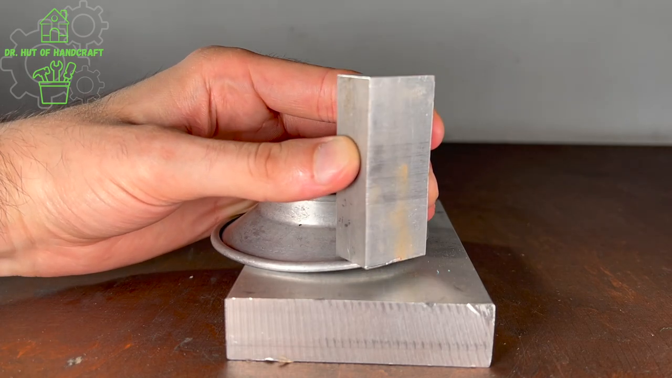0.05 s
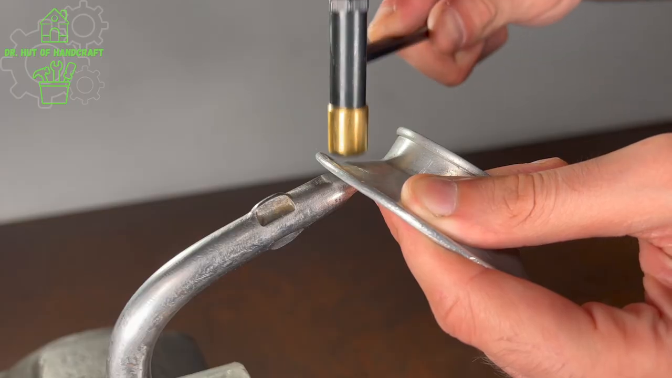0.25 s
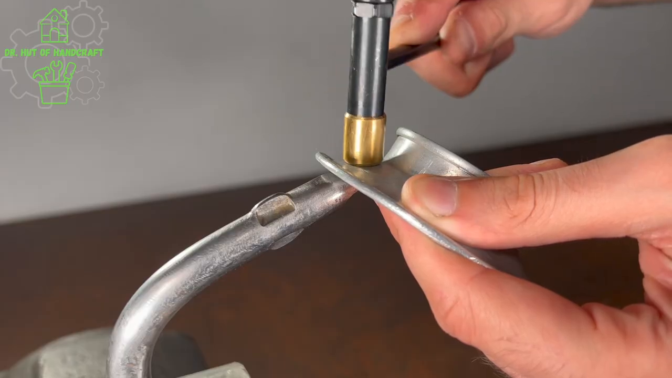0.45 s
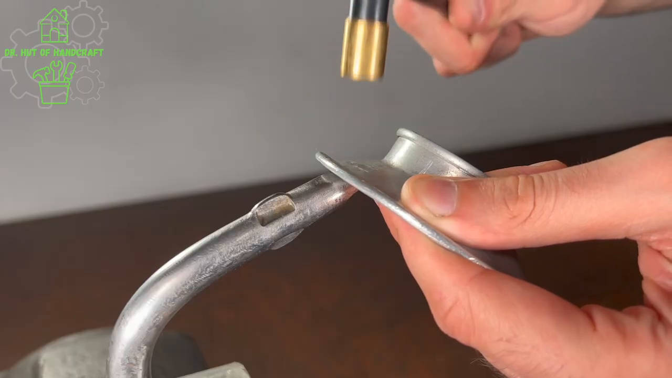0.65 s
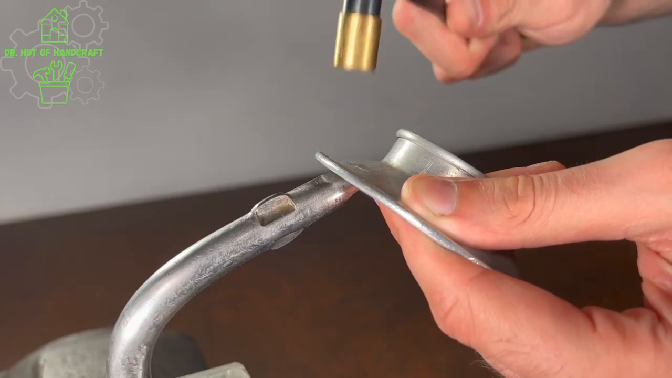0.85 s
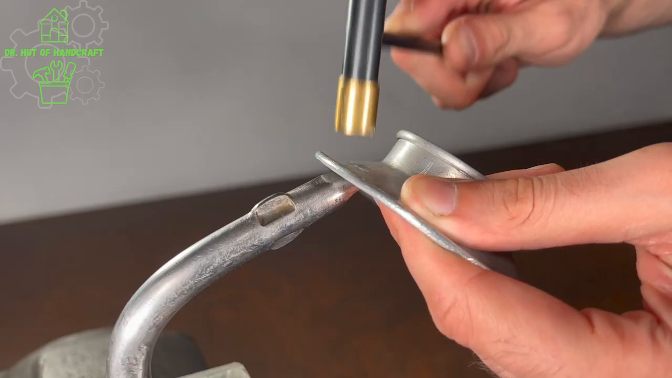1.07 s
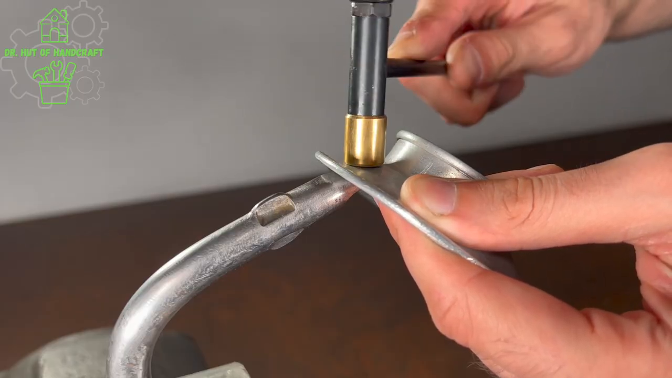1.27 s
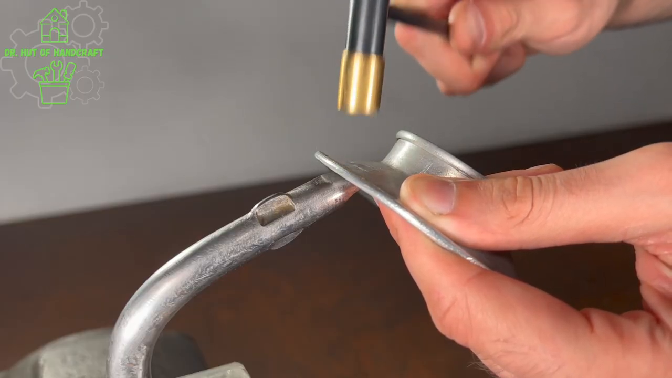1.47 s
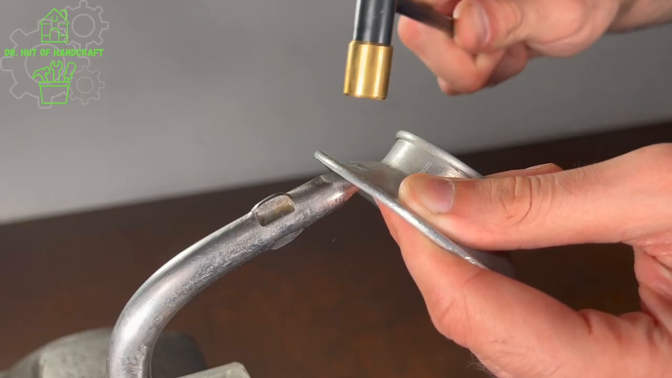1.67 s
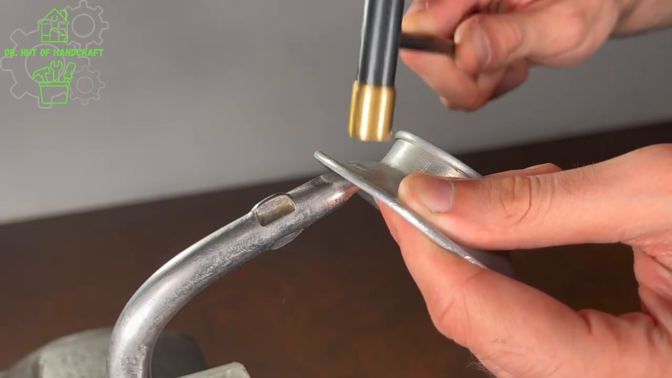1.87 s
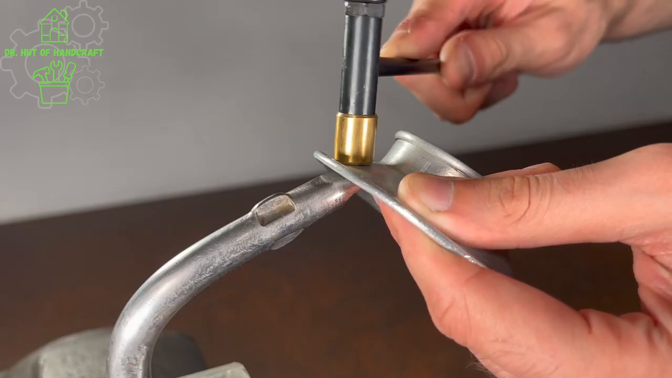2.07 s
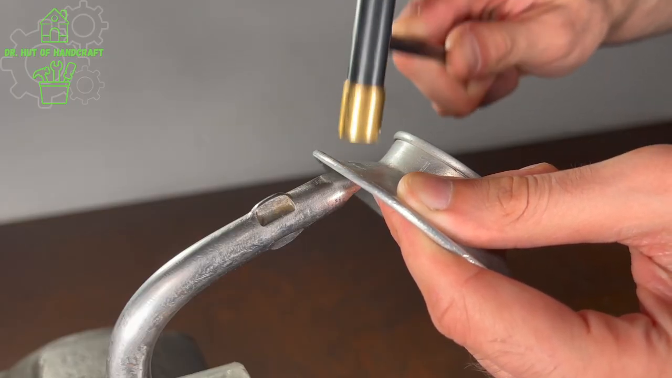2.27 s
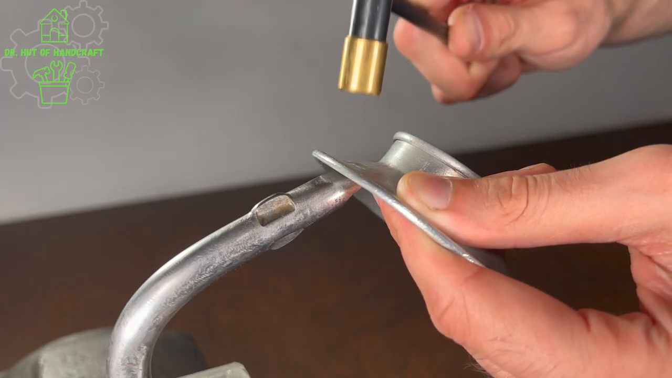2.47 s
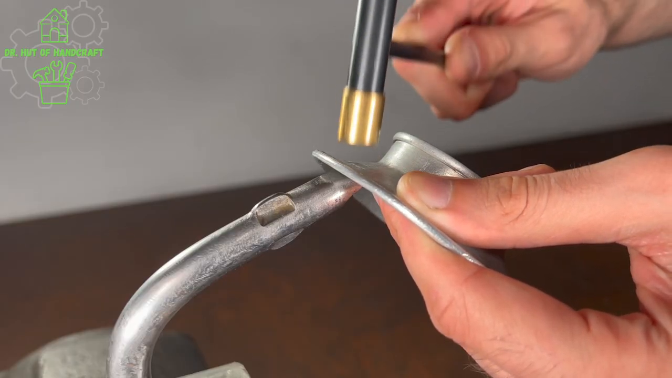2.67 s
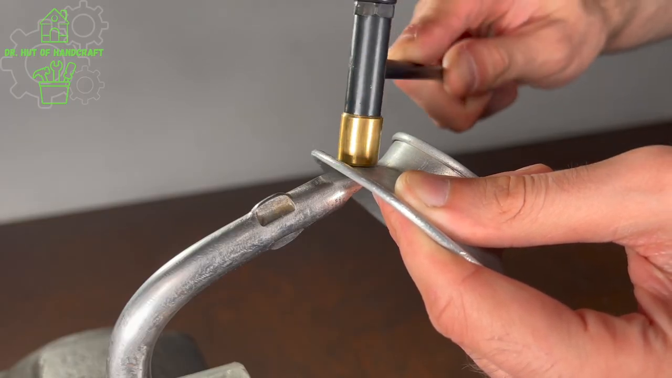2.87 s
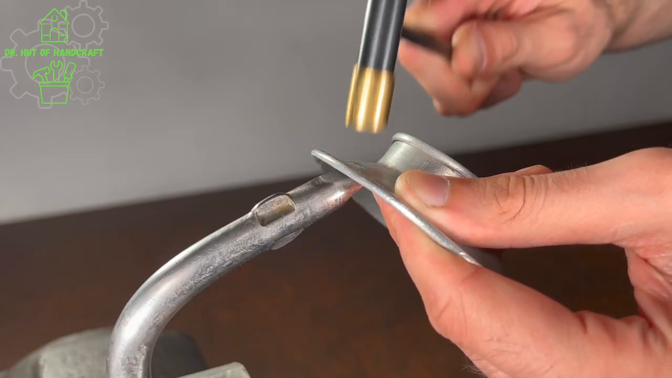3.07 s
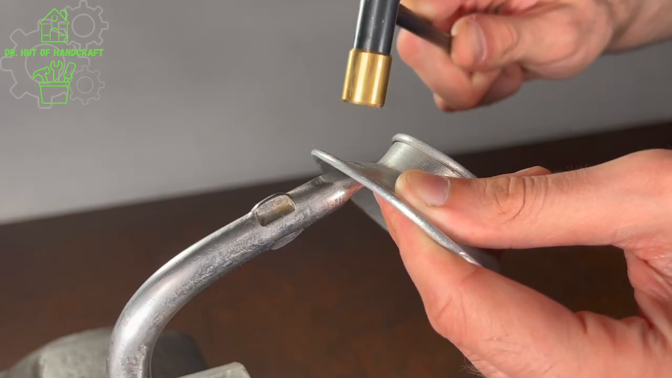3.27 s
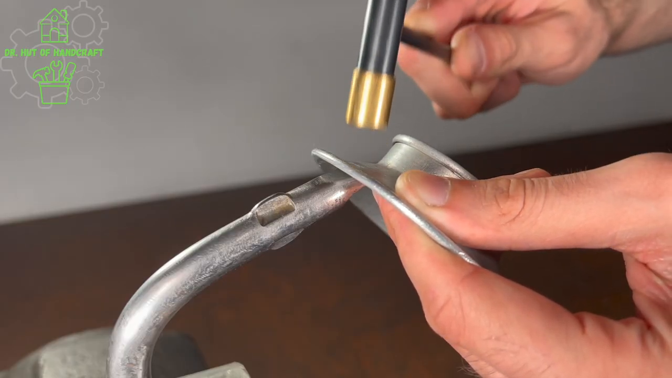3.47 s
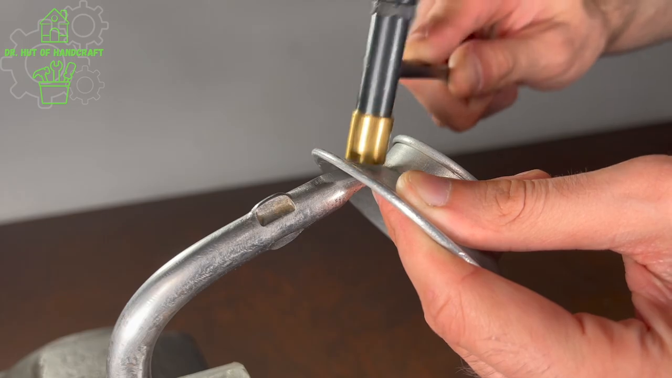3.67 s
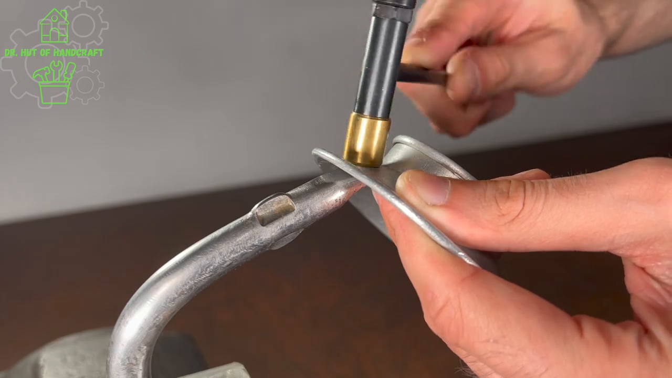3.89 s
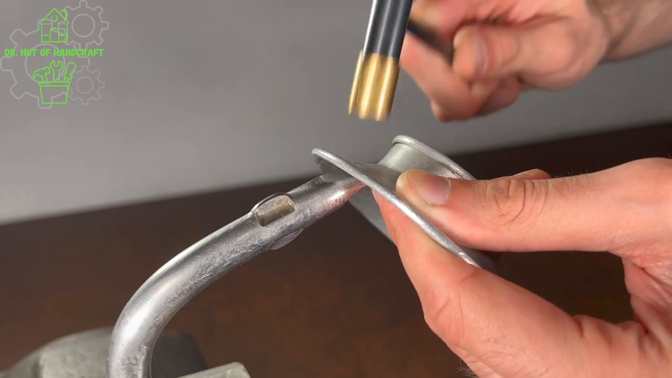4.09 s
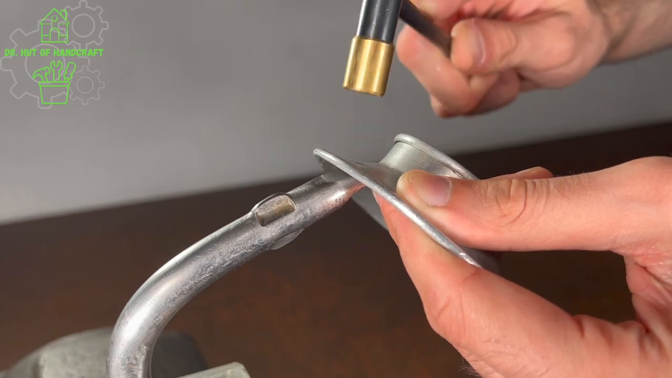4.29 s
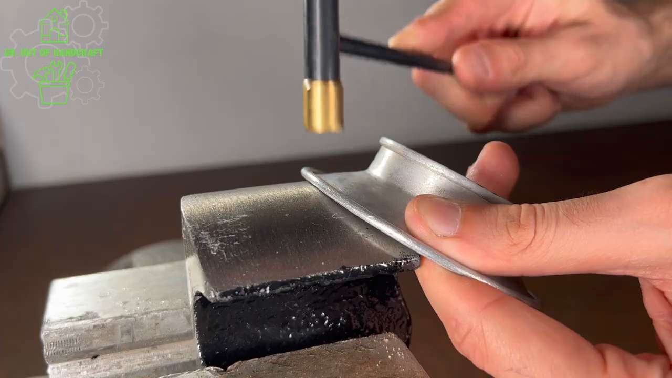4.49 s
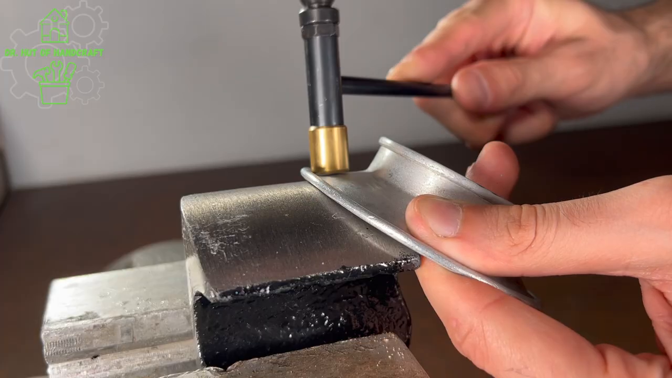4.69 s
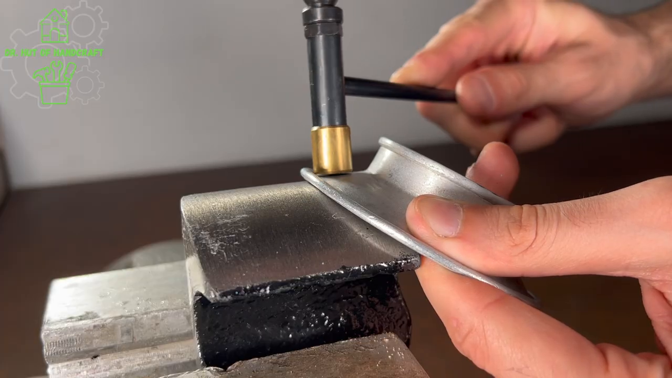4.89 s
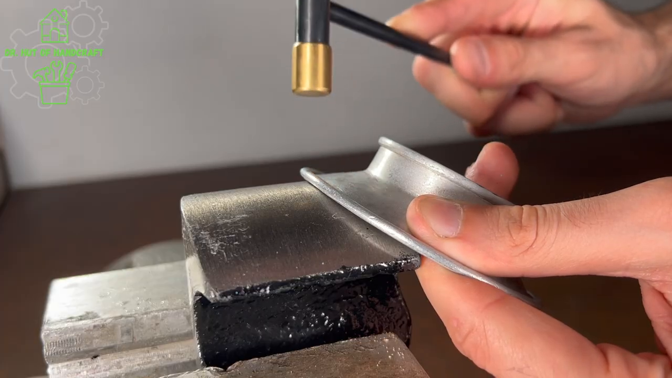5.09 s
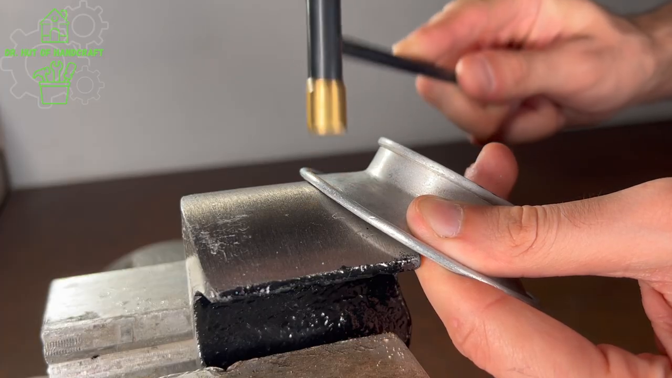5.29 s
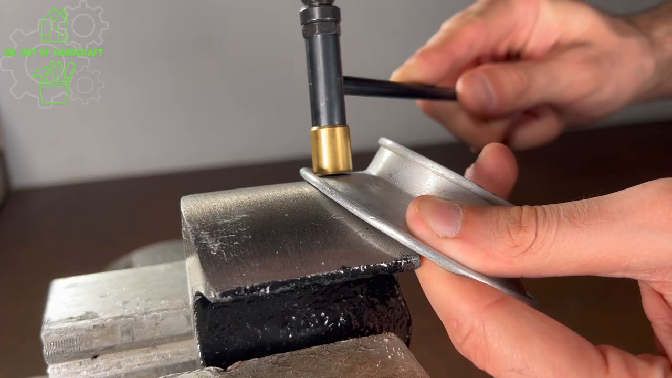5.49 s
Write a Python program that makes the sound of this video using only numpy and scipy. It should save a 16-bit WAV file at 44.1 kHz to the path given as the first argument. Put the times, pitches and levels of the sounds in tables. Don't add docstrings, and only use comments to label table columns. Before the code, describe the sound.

A small brass hammer taps a sheet-metal part about four times a second, sharp ticks with a faint steel ring, then duller over a block.

```python
import sys
import numpy as np
from scipy import signal
from scipy.fft import rfft, irfft, next_fast_len
from scipy.io import wavfile

SR = 44100
rng = np.random.default_rng(int(sys.argv[2]) if len(sys.argv) > 2 else 0)


def generate_wav(sig):
    pcm = np.round(np.clip(np.atleast_2d(sig).T, -1, 1) * 32767).astype(np.int16)
    wavfile.write(sys.argv[1], SR, pcm)


def to_linear_factor(level_db):
    exponent = np.asarray(level_db, float) / 20
    return 10 ** exponent


N = 244314
LEAD = round(0.3 * SR)
SIZE = next_fast_len(N + LEAD + SR)


def rms_one(x):
    return x / np.sqrt(np.mean(x ** 2) + 1e-20)


def at_hz(points, hz, column=1):
    points = np.array(points)
    return np.interp(np.log(hz), np.log(points[:, 0]), points[:, column])


def pitches(length):
    return np.maximum(np.arange(length // 2 + 1) * SR / length, 1)


def lay(times, sounds):
    out = np.zeros(SIZE)
    for start_s, sound in zip(times, sounds):
        at = LEAD + round(start_s * SR)
        out[at:at + len(sound)] += sound
    return out


def strike(times, level_db, modes, offset_db, swell_s, delay_s, scatter_db, rattle_db, rattle_t60_s):
    hz, mode_db, t60 = np.transpose(modes)[:, :, None]
    length_s = min(1.2 * max(t60.max(), rattle_t60_s), 0.5)
    t = np.arange(round(length_s * SR)) / SR
    shape = to_linear_factor(mode_db - 60 * t / t60) * np.exp(2j * np.pi * hz * t)
    chance = rng.standard_normal((len(times), 2, len(modes)))
    strength = to_linear_factor(scatter_db * chance[:, 0]) * np.exp(1j * np.pi * chance[:, 1])
    edges = [0.8 * hz.min(), min(1.122 * hz.max(), 0.45 * SR)]
    band = signal.butter(2, edges, "band", fs=SR, output="sos")
    noise = rng.standard_normal((len(times), SR // 2))[:, :len(t)]
    rattle = rms_one(signal.sosfilt(band, noise)) * to_linear_factor(rattle_db - 60 * t / rattle_t60_s)
    swell = 1 - np.exp(-t / swell_s)
    sounds = ((strength @ shape).imag + rattle) * swell
    energy = np.sum(sounds ** 2, axis=1)
    gain = to_linear_factor(level_db + offset_db) * np.sqrt(energy.mean() / energy)
    return lay(times + delay_s, sounds * gain[:, None])


# start_s, force_db, clank_db, sheet_db, seating_db (how firmly the part sits on the steel)
PIPE_BLOWS = [(0.1371, 0, -28.5, -25.5, -1), (0.3987, 1, -41, -32, -1), (0.6637, 4, -33.5, -29.5, 2.5),
              (0.9347, 3.5, -30.5, -27, 2.5), (1.186, 2.5, -49, -27.5, 4.5), (1.4643, 2, -32, -36, -3),
              (1.7077, -2, -34.5, -38, -3.5), (1.9796, 2, -41.5, -31, 7), (2.2517, 0, -33, -34.5, -1),
              (2.5314, 1.5, -41.5, -36.5, -2.5), (2.7948, -1.5, -36, -43, -20.5),
              (3.0569, 1, -32.5, -38.5, -5), (3.3114, -1, -24.5, -38, -4), (3.565, 0.5, -38.5, -35.5, -4.5),
              (3.8361, -2, -34.5, -39, -3.5), (4.0798, 0, -32, -36, 1.5), (4.3217, 1, -30, -38.5, -21)]
FORM_BLOWS = [(4.5726, -3.5, -40.5, -44.5, 0), (4.825, -2.5, -41, -44.5, 1), (5.1205, 1.5, -41, -44, 5),
              (5.3817, -2, -37, -43, -4)]
OPENING_BLOW = (-0.1, -8, -39, -46, -40)
FORM_FIRST_BLOW = (4.31, -4, -40, -52, -3)
# pitch_hz, level_db, t60_s (time to fall by 60 dB)
HAMMER_TICK = [(10655, 0, 0.0022), (13640, 1, 0.0036), (15100, -9, 0.0033), (11320, -21, 0.0022)]
PIPE_CLANK = [(4627, -8, 0.043), (5150, -3, 0.02), (5900, -2, 0.0048), (6664, 0, 0.0073),
              (7204, -4.5, 0.018), (9000, -9.5, 0.0022)]
PIPE_SHEET = [(1033, -16, 0.076), (1162, -11.5, .12), (1189, -3, 0.036), (1225, 3, 0.021), (1710, 3, 0.013),
              (1743, -4, 0.019), (2307, -5, 0.017), (2593, -2.5, 0.025), (2840, -7.5, 0.028),
              (3004, -0.5, 0.026), (3483, -4.5, 0.018), (3769, -7, 0.029)]
PIPE_KNOCK = [(242.6, -16, 0.15), (308.3, 1.5, 0.094), (426.2, -14, 0.06), (538.4, -9.5, 0.07),
              (736.7, -3, 0.05)]
FORM_CLANK = [(5250, -15, 0.0087), (6230, -17, 0.0057), (8360, 17, 0.0067)]
FORM_SHEET = [(980, -4, 0.03), (1212, 12.5, 0.0092), (2330, -2.5, 0.015), (3630, -15, 0.025)]
FORM_KNOCK = [(173.2, -8, 0.21), (248, -2, 0.099), (301.3, -3.5, 0.15), (420, -12.5, 0.14),
              (595, -10, 0.0068), (679, -4.5, 0.059)]
BENCH_THUD = [(49, -9.5, 0.19), (64.4, -7, .25), (86.5, 0.5, .35), (113.2, 0, .15)]
# offset_db, swell_s, delay_s, scatter_db, rattle_db, rattle_t60_s
BLOW_PARTS = [
    (1.5, 0.00019, .0008, 1, 2.5, 0.0034),
    (2, 0.00077, 0.0010014, 1, 0.5, 0.0047),
    (2.5, 0.00074, 0.000945, 1, -1, 0.028),
    (3, 0.0047, 0.00109, 4.5, 2.5, 0.038),
    (5, 0.0089, .008, -0.5, -11.5, 0.56),
]
# time_s, thud_db
THUD_LEVEL = [(0.3, -52), (3.3, -63), (4.3, -54.5), (5.5, -53)]
PIPE_KNOCK_DB, FORM_KNOCK_DB = -38.5, -46.5


def hammer(blows, clank, sheet, knock, knock_db):
    times, force_db, clank_db, sheet_db, seating_db = np.transpose(blows)
    tick_db = -18 + force_db
    bench_db = 0.23 * force_db
    knock_db = knock_db + bench_db + 0.11 * seating_db
    thud_db = np.interp(times, *np.transpose(THUD_LEVEL)) + bench_db
    levels = [tick_db, clank_db, sheet_db, knock_db, thud_db]
    bodies = [HAMMER_TICK, clank, sheet, knock, BENCH_THUD]
    return sum(strike(times, db, modes, *part) for db, modes, part in zip(levels, bodies, BLOW_PARTS))


# pitch_hz, level_db, t60_s
PIPE_RING = [(941.5, 1, .55), (1093, 9, .42), (1591.5, 9, .52)]
FORM_RING = [(1125.5, 4, .6), (1583, 10, .5)]
# first_blow_db, change_db_per_s, share_of_seating
PIPE_RING_LAW = [(-39, -2.5, 0.23), (-44.5, -5, 0.97), (-52.5, -0.63, 0.91)]
FORM_RING_LAW = [(-62, -0.7, 0.89), (-69, 8.5, 0.17)]
RING_WIDTH = 0.78


def steel(blows, law, ring):
    times, *_, seating_db = np.transpose(blows)
    first_db, db_per_s, share = np.transpose(law)[:, :, None]
    hz, tone_db, t60 = np.transpose(ring)[:, :, None]
    t = np.arange(SR // 2) / SR
    swell = 1 - np.exp(-t / 0.0022)
    tones = to_linear_factor(-0.5 + tone_db - 60 * t / t60) * np.sin(2 * np.pi * hz * t) * swell
    level_db = first_db + db_per_s * (times - times.min()) + share * seating_db
    return lay(times, to_linear_factor(level_db).T @ tones)


# pitch_hz, level_db, t60_s
BENCH_JOLT = [(51.4, -6.5, 0.36), (84, 2.5, 0.068), (130, -11, 0.046)]


def jolt():
    return strike(np.array([5.128]), -30.5, BENCH_JOLT, 0, 0.003, 0, 0, -12, 0.05)


# pitch_hz, level_db (per Hz)
PIPE_WASH = [(1060, -32), (1800, 0.5), (4060, -9.5), (4880, 3), (8000, -10), (11600, -10.5), (14600, -14),
             (16000, -14.5)]
FORM_WASH = [(1060, -29), (1800, -3.5), (3200, -10), (5900, -0.5), (8440, -5.5), (10800, -7), (14500, -9.5),
             (16000, -13)]
PIPE_WASH_DB, FORM_WASH_DB = -63, -55.5


def wash(blows, spectrum, level_db):
    times, force_db, *_ = np.transpose(blows)
    t = np.arange(SR // 2) / SR
    hz = pitches(len(t))
    alike = np.clip(at_hz(ROOM, hz, column=5), 0, 1)
    noise = rfft(rng.standard_normal((2, len(times), len(t))))
    mid, side = noise * to_linear_factor(at_hz(spectrum, hz) + at_hz(ECHO_GAP, hz))
    start_db = level_db + 12 + force_db[:, None]
    fall = to_linear_factor(start_db - 60 * t / 0.37) * (1 - np.exp(-t / 0.0051))
    both = []
    for sign in (1, -1):
        port = np.sqrt(1 + alike) * mid + sign * np.sqrt(1 - alike) * side
        both.append(lay(times, fall * rms_one(irfft(port))))
    return rfft(both)


# pitch_hz, echo_db, early_t60_s, late_db, late_t60_s, left_right_likeness
ROOM = [(98, -10, 0.056, -2, 0.57, 0.99), (297, -6.5, 0.13, -6.5, 0.36, 0.89),
        (716, -1.5, 0.11, -3.5, 0.32, 0.7), (1310, -4.5, 0.056, -11, 0.27, 0.033),
        (2800, -6, 0.091, -9.5, 0.4, 0.37), (4700, -11, 0.077, -7.5, 0.34, 0.081),
        (7400, -12.5, 0.032, -10, 0.31, 1), (13700, -18, 0.011, -4.5, 0.18, 0.96)]


def diffuse_echo(t):
    common, apart = np.zeros((2, len(t)))
    edges = 60 * 2 ** np.arange(0, 8.6, 0.5)
    for low, high in zip(edges, np.minimum(edges[1:], 0.45 * SR)):
        band = signal.butter(2, [low, high], "band", fs=SR, output="sos")
        mid, side = signal.sosfilt(band, rng.standard_normal((2, len(t))))
        middle = np.sqrt(low * high)
        echo_db, early, late_db, late, alike = [at_hz(ROOM, middle, column=k) for k in range(1, 6)]
        fall = to_linear_factor(echo_db - 20) * (to_linear_factor(-60 * t / early) + to_linear_factor(late_db - 60 * t / late))
        fall *= 1 - np.exp(-t / 0.0037)
        alike = np.clip(alike, 0, 1)
        common += fall * np.sqrt(alike) * mid
        apart += fall * np.sqrt(1 - alike) * side
    return np.array([common + apart, common - apart])


# pitch_hz, left_minus_right_db
PORT_DB = [(60, 2.5), (99, 1), (160, -6.5), (270, 0.5), (450, 1.5), (740, -6), (1220, 4.5), (2010, 2.5),
           (3330, 4), (5500, 6.5), (8500, 1), (15000, -2)]
# pitch_hz, left_lead_radians
PORT_LEAD = [(0, 0), (700, .3), (1100, 2.3), (2070, 2.6), (2760, 0), (5000, .9), (7600, -.4),
             (10150, -3.14), (12200, -5.6), (14800, -6.9), (16500, -9)]


def microphone_ports(hz):
    level = to_linear_factor(at_hz(PORT_DB, hz) / 2)
    return np.array([level * np.exp(1j * np.interp(hz, *np.transpose(PORT_LEAD))), 1 / level])


# left_s, right_s, level_db
ECHOES = [(.0042, .0047, -21), (.0085, .0077, -21), (.0118, .0118, -17), (.019, .0203, -23)]
# pitch_hz, level_db
FORM_WET = [(300, -0.5), (800, -3), (2500, 9.5), (5500, 5.5), (8200, 1), (14000, 1)]
# pitch_hz, level_db
ECHO_GAP = [(15600, 0), (16300, -30)]


def walls():
    t = np.arange(SR // 2) / SR
    clicks = np.zeros((2, len(t)))
    clicks[:, 0] = 1
    for left_s, right_s, db in ECHOES:
        clicks[0, round(left_s * SR)] = to_linear_factor(db)
        clicks[1, round(right_s * SR)] = to_linear_factor(db)
    hz = pitches(SIZE)
    ports = microphone_ports(hz)
    direct = ports * rfft(clicks, SIZE)
    diffuse = diffuse_echo(t)
    gap = to_linear_factor(at_hz(ECHO_GAP, hz))
    echo = ports * rfft(diffuse, SIZE) * gap
    far = ports * rfft(diffuse * to_linear_factor(-2 * t), SIZE) * gap
    far *= to_linear_factor(at_hz(FORM_WET, hz) - 3) * np.exp(-2j * np.pi * hz * 0.008)
    pipe_room = direct + echo * to_linear_factor(-2 * np.clip(hz / 4000, 0, 1))
    form_room = direct + 0.54 * echo + far
    return ports, pipe_room, form_room


# pitch_hz, level_db (per Hz)
HUM = [(15, -19), (30, -12.5), (45, -6.5), (75, -4.5), (140, -15.5), (300, -27.5), (800, -37),
       (2000, -40.5), (5000, -38), (9000, -54), (16000, -72.5)]


def hum(fan_on):
    fan_hz, fan_width_hz = 151, 3.6
    hz = pitches(N)
    mid, side, air = rfft(rng.standard_normal((3, N)))
    apart = np.clip(hz / 1500, 0, 1)
    rumble = irfft(to_linear_factor(at_hz(HUM, hz)) * (mid + apart * side * [[1], [-1]]), N)
    fan = irfft(air / (1 + ((hz - fan_hz) / fan_width_hz) ** 2), N)
    return to_linear_factor(-68.5) * rms_one(rumble) + fan_on * to_linear_factor(-68) * rms_one(fan)


def scene():
    ports, pipe_room, form_room = walls()
    ring_ports = ports ** RING_WIDTH
    form_blows = np.array([FORM_FIRST_BLOW, *FORM_BLOWS])

    opening = form_room * rfft(hammer([OPENING_BLOW], FORM_CLANK, FORM_SHEET, FORM_KNOCK, FORM_KNOCK_DB))
    opening += ports * wash([OPENING_BLOW], FORM_WASH, FORM_WASH_DB)

    pipe = pipe_room * rfft(hammer(PIPE_BLOWS, PIPE_CLANK, PIPE_SHEET, PIPE_KNOCK, PIPE_KNOCK_DB))
    pipe += ring_ports * rfft(steel(PIPE_BLOWS, PIPE_RING_LAW, PIPE_RING))
    pipe += ports * wash(PIPE_BLOWS, PIPE_WASH, PIPE_WASH_DB)

    form_hits = hammer(form_blows, FORM_CLANK, FORM_SHEET, FORM_KNOCK, FORM_KNOCK_DB)
    form = form_room * rfft(form_hits + jolt())
    form += ring_ports * rfft(steel(form_blows, FORM_RING_LAW, FORM_RING))
    form += ports * wash(form_blows, FORM_WASH, FORM_WASH_DB)

    opening, pipe, form = irfft([opening, pipe, form], SIZE)[..., LEAD:LEAD + N]
    t = np.arange(N) / SR
    opening_change_s, form_change_s, fade_s = 0.1, 4.44, 0.016
    first = np.clip((t - opening_change_s) / fade_s + 0.5, 0, 1)
    second = np.clip((t - form_change_s) / fade_s + 0.5, 0, 1)
    dip = np.maximum(1 - first, np.clip((t - opening_change_s - 0.01) / 0.042, 0, 1))
    blows = (1 - first) * opening + (1 - second) * pipe + second * form
    return blows + dip * hum(first - second)


def top_cut(x):
    return signal.sosfilt(signal.butter(12, 17140, fs=SR, output="sos"), x)


def record(dry):
    low_pass = signal.butter(14, 16200, fs=SR, output="sos")
    heard = signal.sosfilt(low_pass, dry)
    return top_cut(heard)


dry = scene()
out = record(dry)
generate_wav(out)
```